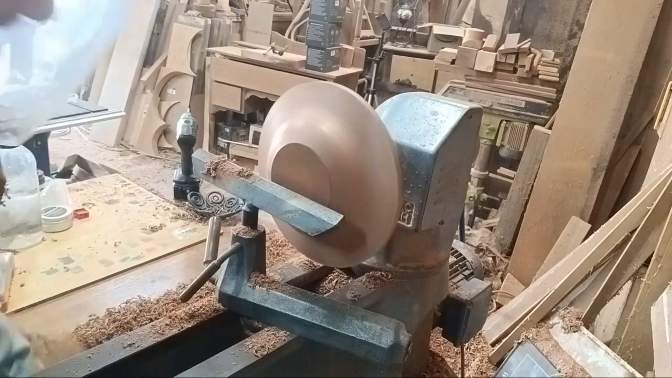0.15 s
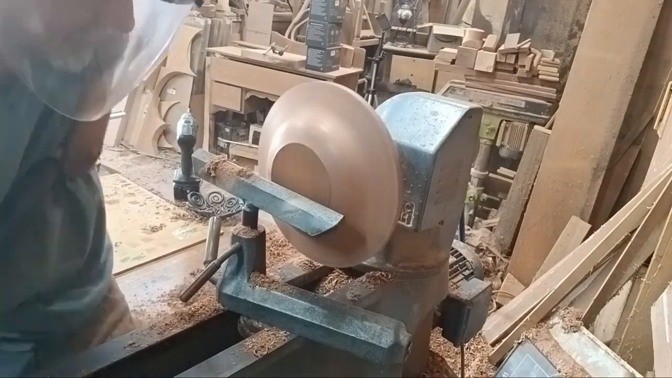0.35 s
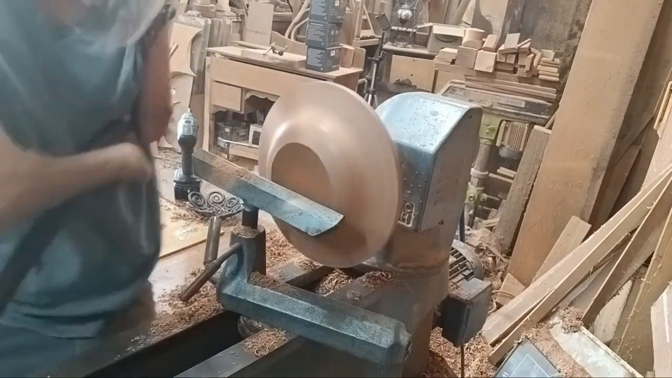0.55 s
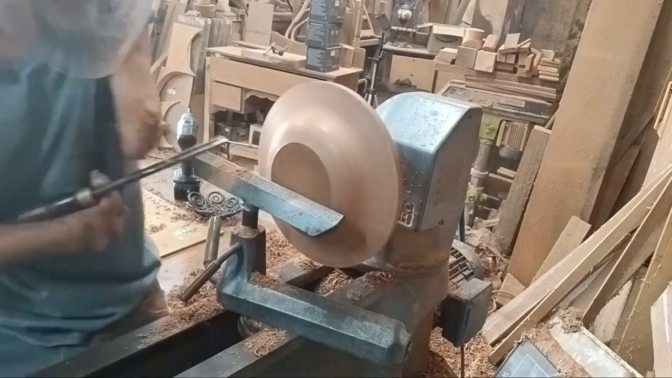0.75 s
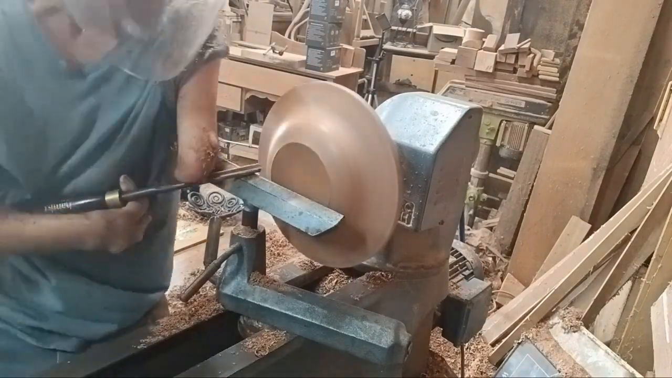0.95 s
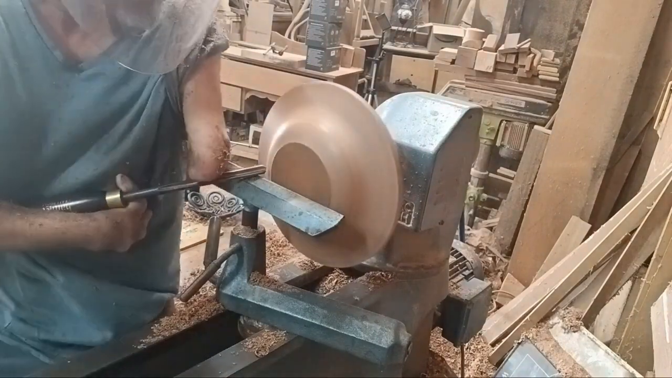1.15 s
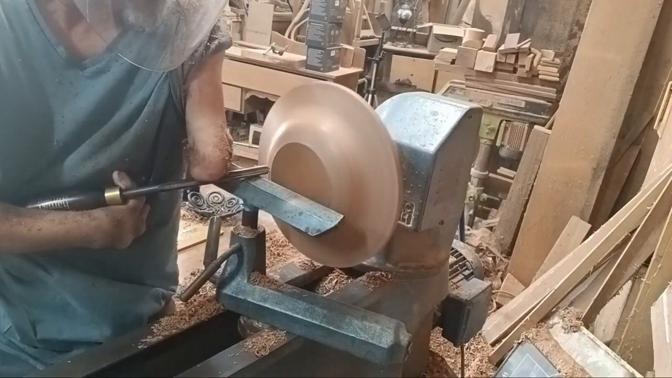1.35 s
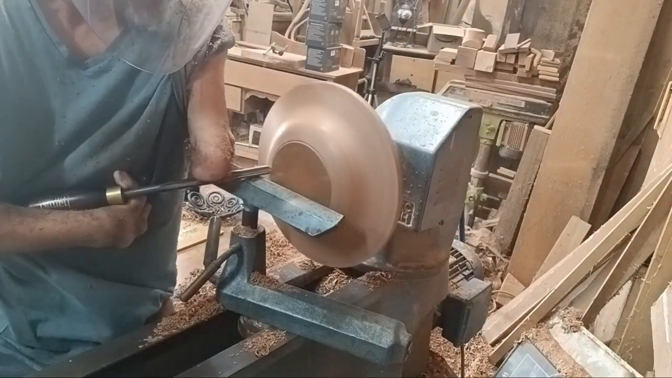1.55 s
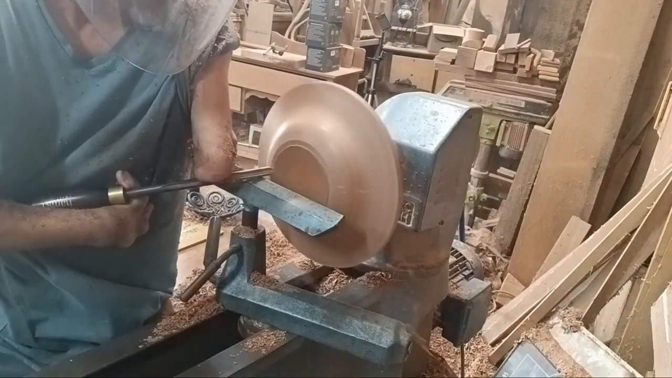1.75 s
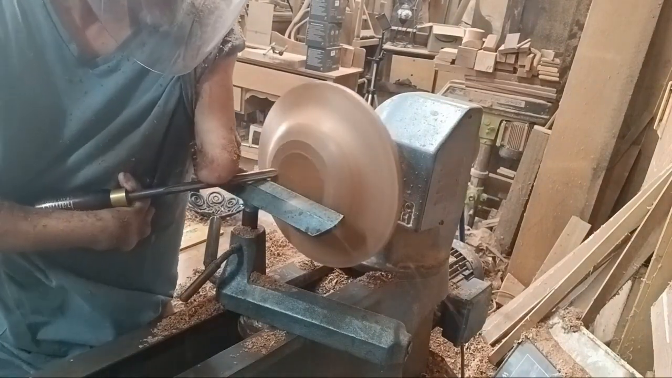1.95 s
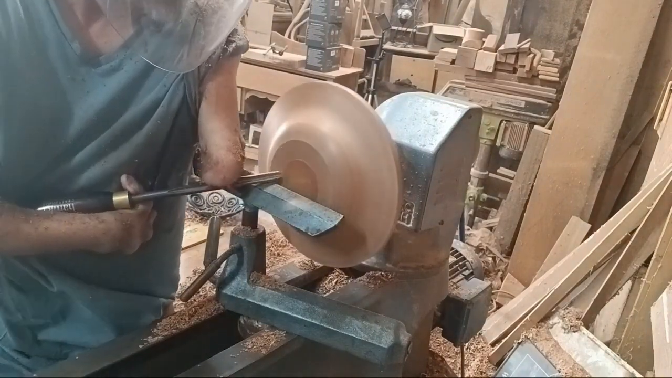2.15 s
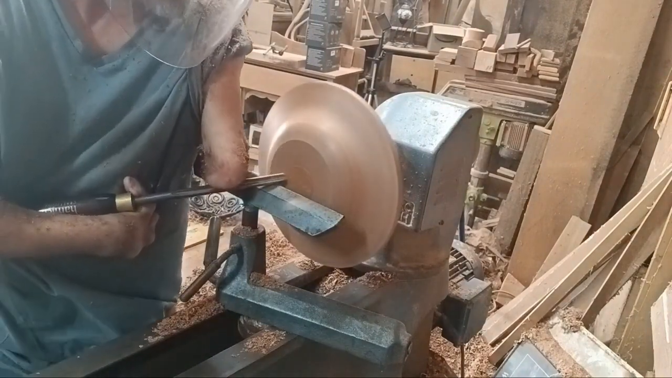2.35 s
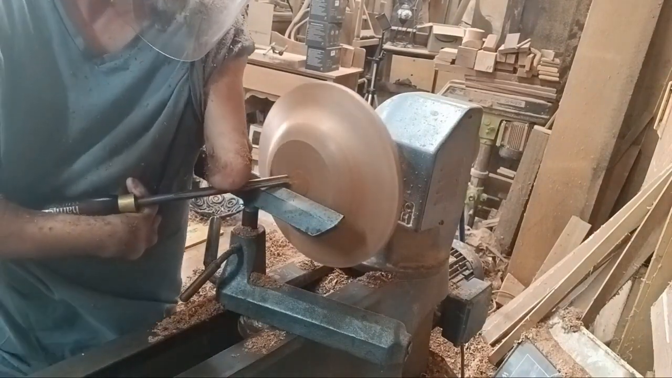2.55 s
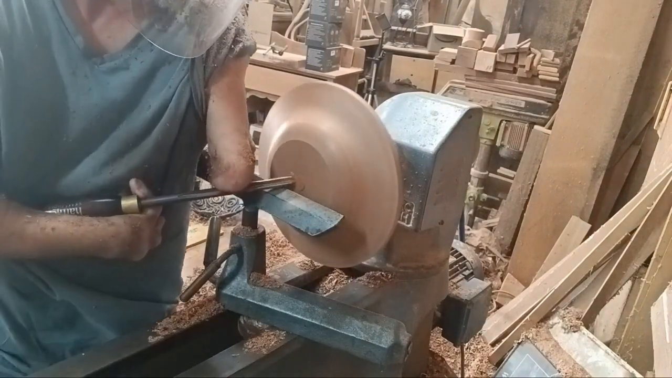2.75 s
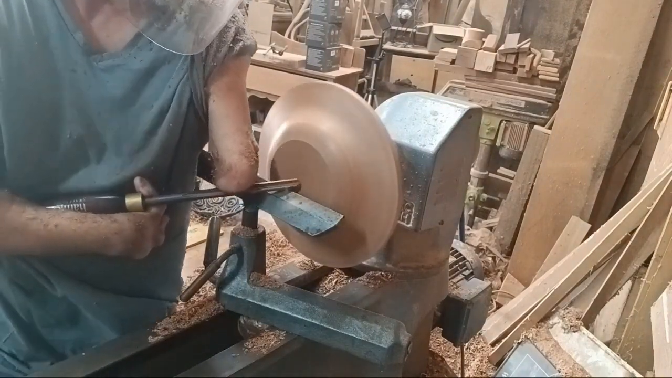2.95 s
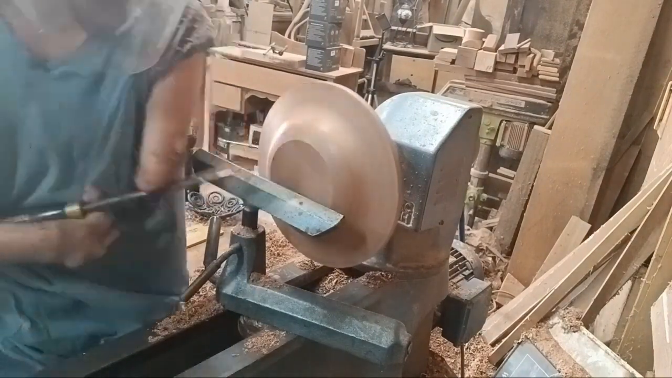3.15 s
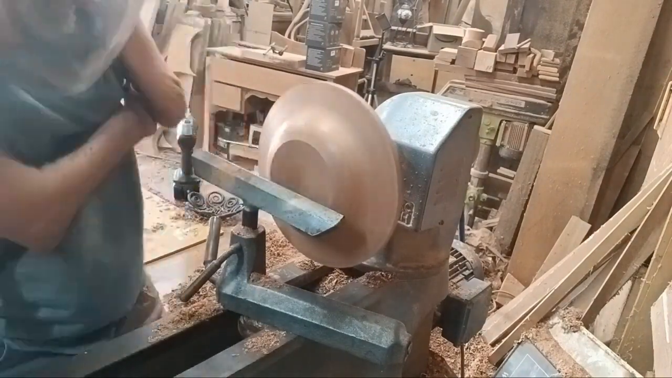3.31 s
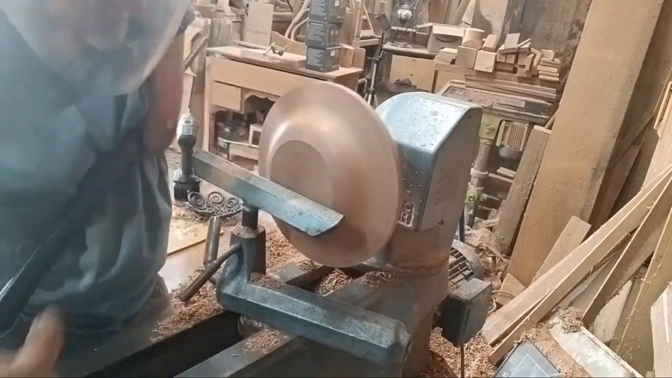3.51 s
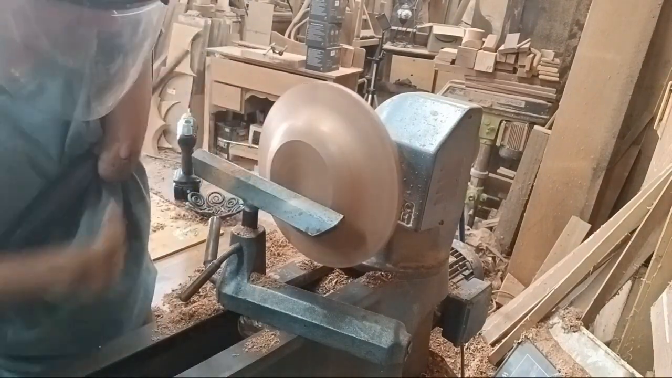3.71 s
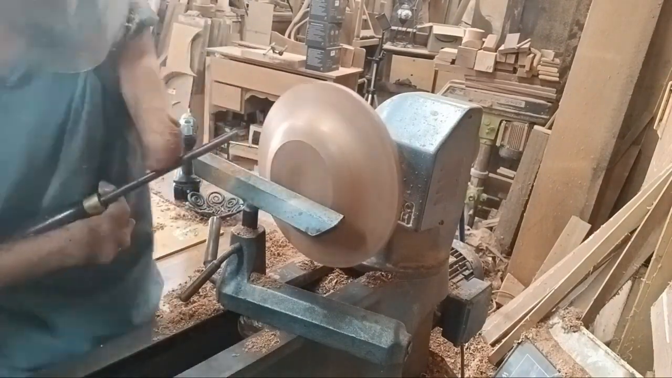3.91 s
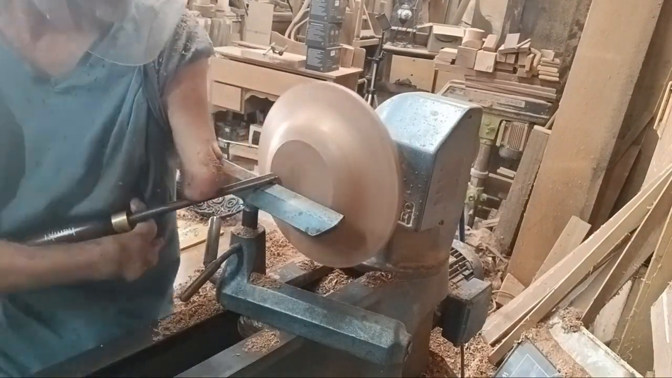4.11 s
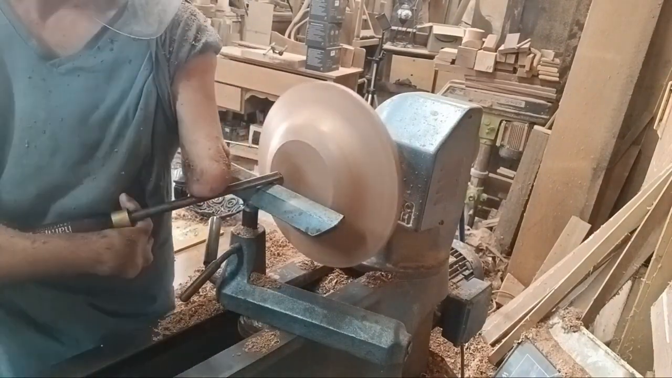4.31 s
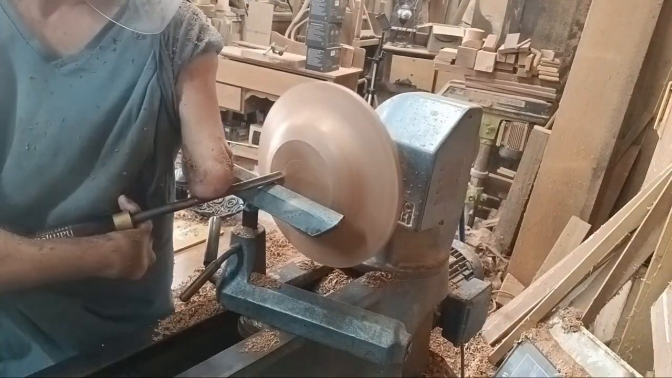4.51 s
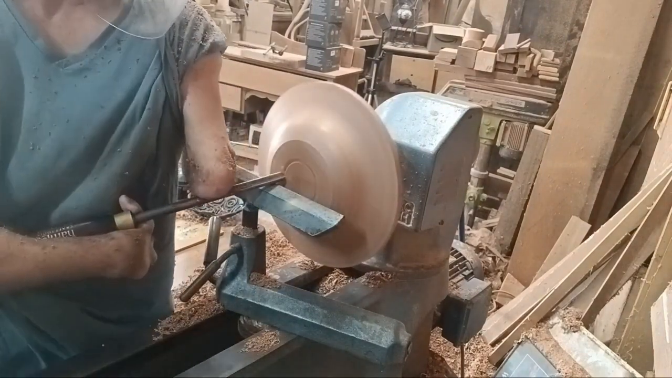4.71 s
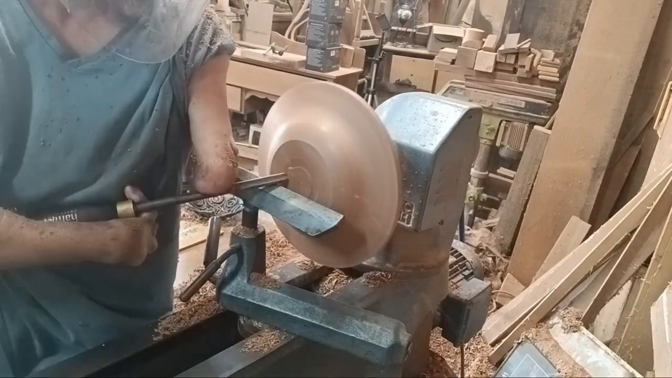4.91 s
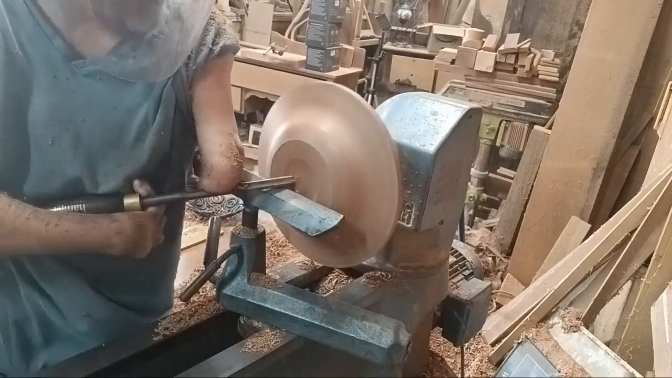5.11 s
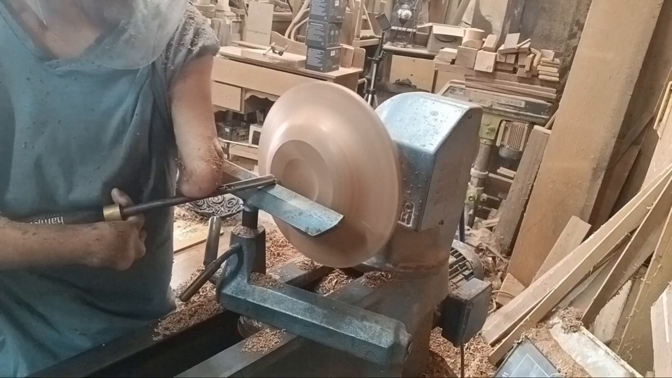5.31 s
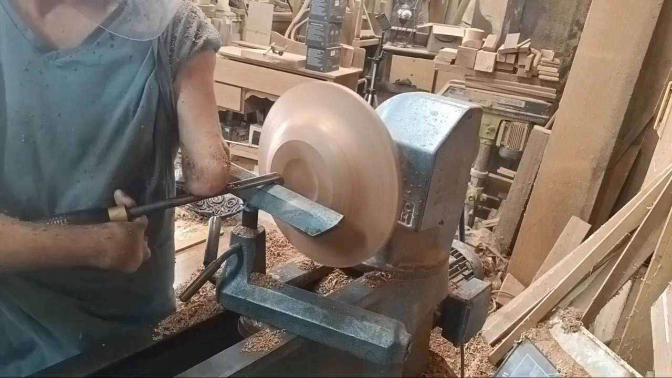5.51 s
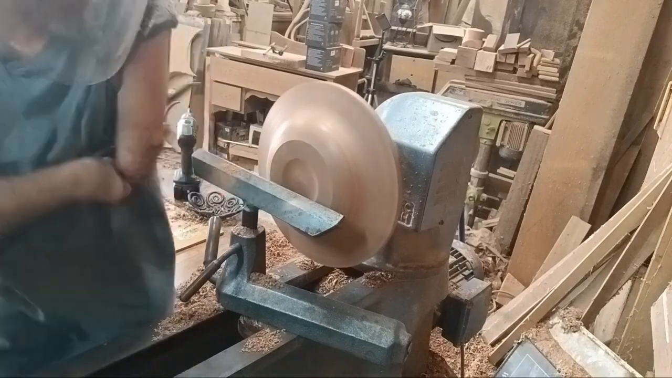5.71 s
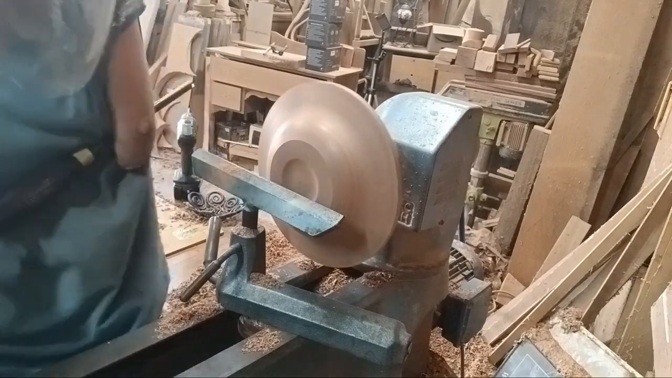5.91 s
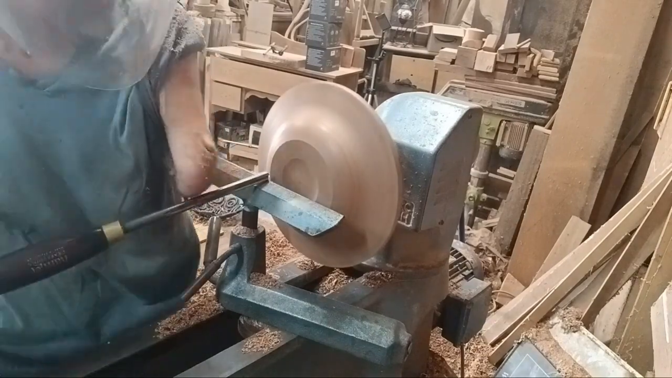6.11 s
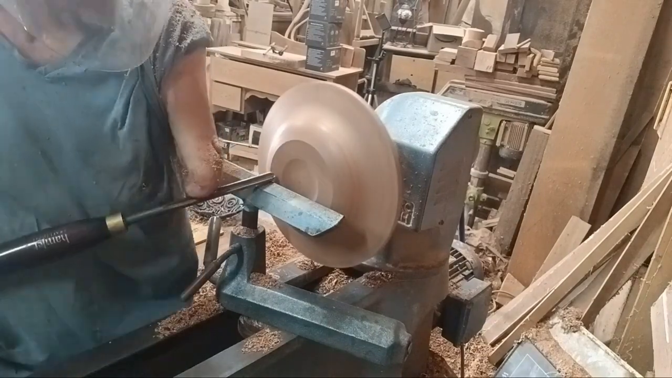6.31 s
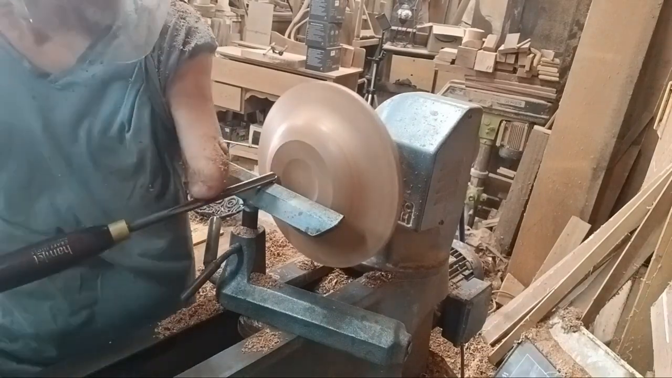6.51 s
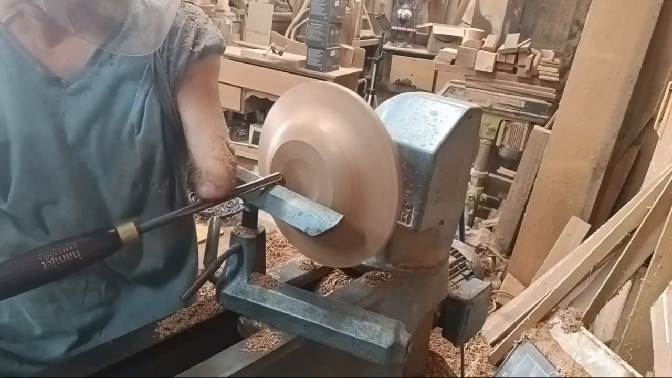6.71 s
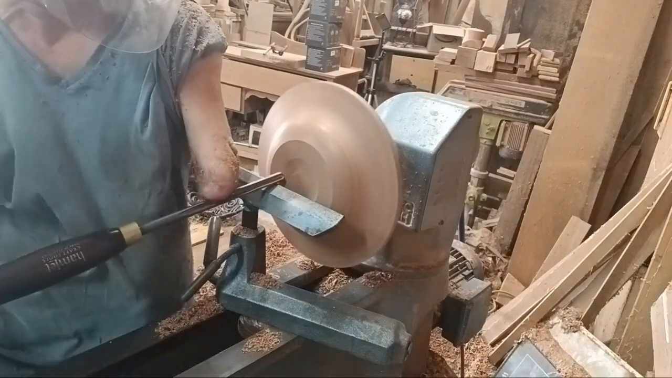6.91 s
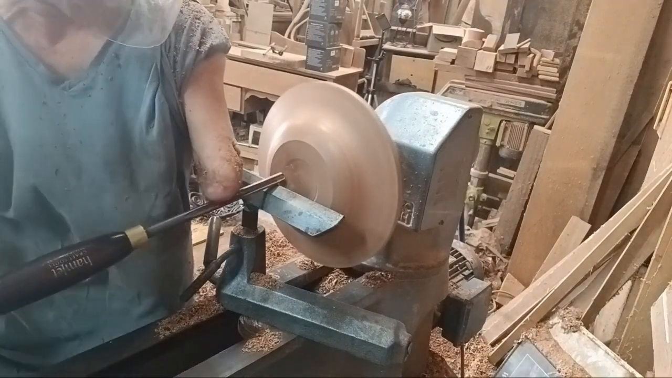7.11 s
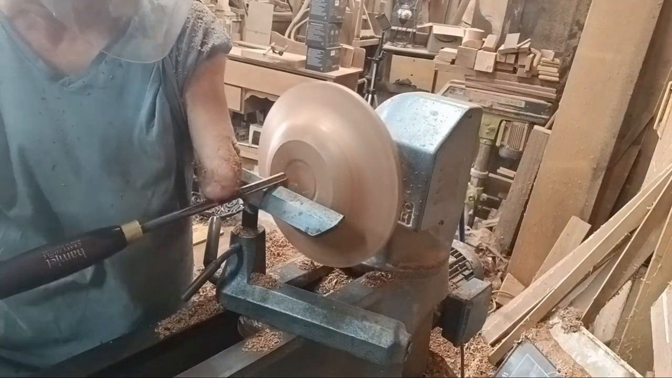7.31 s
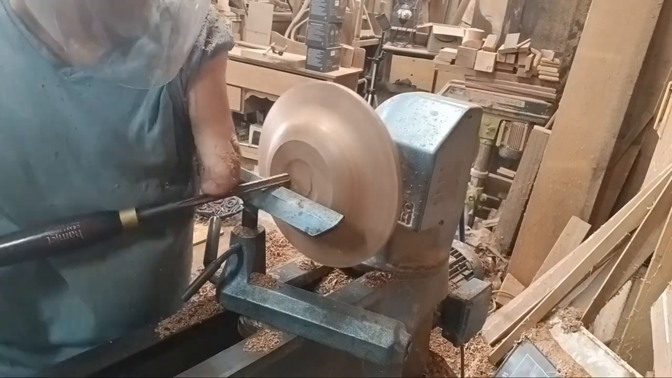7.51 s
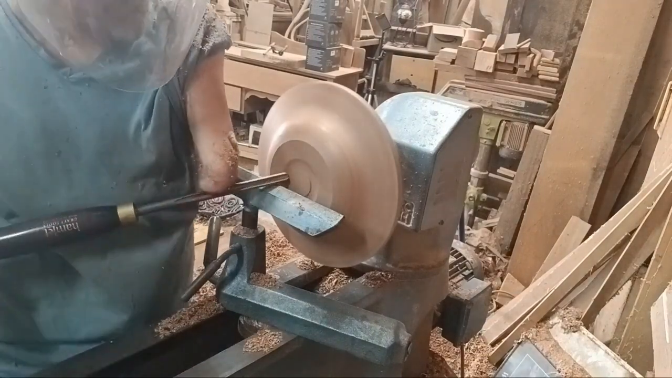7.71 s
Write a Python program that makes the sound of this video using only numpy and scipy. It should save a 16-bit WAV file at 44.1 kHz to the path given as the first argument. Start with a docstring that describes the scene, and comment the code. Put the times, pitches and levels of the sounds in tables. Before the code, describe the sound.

Close to a wood lathe in stereo: constant rushing belt and bearing noise, wavering motor hum, thin electronic whine. Dull rubbing scuffs and sharp metal knocks with short dry room scatter occur between cuts. The gouge then tears at the spinning bowl in three fierce, bright, rapidly fluttering hisses, with wood ringing and low chattering towards the centre, then starts a fourth. The motor is pushed down during each cut and swells back afterwards.

```python
"""In a small workshop a wooden bowl spins on a lathe; a gouge takes three passes and starts a fourth.
Noise through drifting resonances makes the shavings hiss, the steel sing and the bowl ring;
near the centre the bowl booms and chatters. Before and between passes the gouge knocks on iron: dying sines
and a noise crack. Soft scuffs are swells of dull noise. The motor hums and its speed drive whines, as
wavering tones in broad running noise, and the recorder's gain control ducks both under each cut."""
import sys
import numpy as np
from scipy import signal
from scipy.fft import rfft, irfft
from scipy.io import wavfile
from scipy.ndimage import uniform_filter1d

SR = 44100
rng = np.random.default_rng(int(sys.argv[2]) if len(sys.argv) > 2 else 0)


def transcribe(u):
    """Save the signal u as a 16-bit wav file named by the first command-line argument.

    u: samples, shape (n,) or (channels, n), limited to [-1, 1]; the rate is SR.
    q: integer samples, one column per channel.
    """
    v = np.clip(np.atleast_2d(u).T, -1, 1)
    q = np.round(v * 32767).astype(np.int16)
    wavfile.write(sys.argv[1], SR, q)


N = 341775
TIME = np.arange(N) / SR  # s
FFT_SIZE, HOP = 2048, 512  # samples
BINS = np.fft.rfftfreq(FFT_SIZE, 1 / SR)  # Hz

# how much later the machine reaches the left channel: frequency_hz, lag_ms
MACHINE_LAG = [(60, 0.77), (150, 1), (260, 0.81), (500, 0.46), (1000, 0.4726)]


def amp(db):
    """Decibels to gain."""
    return 10 ** (np.asarray(db) / 20)


def evened(x):
    """Scales to an rms of one."""
    return x / np.sqrt(np.mean(abs(x) ** 2) + 1e-20)


def read(points, hz):
    """Reads a curve of points along a logarithmic frequency axis."""
    point_hz, value = np.transpose(points)
    return np.interp(np.log(hz + 1), np.log(point_hz + 1), value)


def sides(db):
    """Left and right gains of constant power for a left-right level difference."""
    pair = np.array([amp(db / 2), amp(-db / 2)])
    return pair / np.sqrt(np.mean(pair ** 2, axis=0))


def drift(hz):
    """Random wander of rms one: noise under a Gaussian low-pass reaching to about hz."""
    f = np.fft.rfftfreq(N, 1 / SR)
    lowpass = np.exp(-.5 * (f / hz) ** 2)
    return evened(irfft(rfft(rng.standard_normal(N)) * lowpass, N))


def peak(hz, width, db):
    """Power response of one resonance, width in Hz between its half-power points."""
    return amp(db) ** 2 / (1 + (2 * (BINS[:, None] - hz) / width) ** 2)


def colour(x, power, balance):
    """Passes a stereo sound through a power response that may change with time, then evens it."""
    z = signal.stft(x, nperseg=FFT_SIZE, noverlap=FFT_SIZE - HOP)[2]
    response = np.sqrt(power / power.sum(axis=0))
    z = z * response * sides(read(balance, BINS))[:, :, None]
    return evened(signal.istft(z, nperseg=FFT_SIZE, noverlap=FFT_SIZE - HOP)[1][:, :N])


def spread(x, diffuse_db, fade_s, lag=43):
    """Direct sound, lag samples later on the left, in a diffuse wash that follows its power."""
    r = np.exp(-1 / (fade_s * SR))
    level = np.sqrt(signal.lfilter([1 - r], [1, -r], x ** 2))
    wash = level * rng.standard_normal((2, N))
    direct = np.array([np.roll(x, round(lag)), x])
    return direct + amp(diffuse_db) * wash


def workshop(x, t60, wet_db, lag_ms):
    """Direct sound, later on the left, and the short scatter of a room full of timber."""
    t = TIME[:SR // 4]
    tail = rng.standard_normal((2, len(t))) * (t > .0012) * np.exp(-np.log(1000) * t / t60)
    tail *= amp(wet_db) / np.linalg.norm(tail, axis=1, keepdims=True)
    tail[0, round(abs(lag_ms) * SR / 1000)] += 1  # direct sound, left
    tail[1, 0] += 1  # direct sound, right
    return signal.oaconvolve(x[None], tail, axes=1)[:, :N] / np.sqrt(1 + amp(wet_db) ** 2)


def running(flutter_db=0.83):
    """Broad noise of belt, bearings and air; how alike the two channels are depends on frequency."""
    # noise round the spinning bowl, and its treble: frequency_hz, level_db per Hz
    lower_spectrum = [(15, -80), (55, -63.5), (100, -75), (140, -60), (180, -64.5), (215, -65.5),
                      (300, -64), (350, -75.5), (450, -73), (1150, -72), (1750, -69.5), (2900, -67.5),
                      (5000, -74.5), (9700, -77)]
    top_spectrum = [(10500, -79), (12000, -88.5), (16000, -99)]
    # balance at the microphones: frequency_hz, left_right_db
    balance = [(50, 1), (200, 0), (500, 1), (1100, 0.5), (5000, 1.5), (7500, 5), (8500, 2), (9900, -10.5),
               (15000, -17)]
    # likeness of the two channels: frequency_hz, coherence (0-1)
    likeness = [(40, 0.94), (200, 0.79), (400, 1), (800, 0.26), (2000, 0.29), (5000, 0.054)]
    hz = np.fft.rfftfreq(N, 1 / SR)
    right, other = rfft(rng.standard_normal((2, N)))
    same = np.clip(read(likeness, hz), 0, 1)
    later = np.exp(-2j * np.pi * hz * read(MACHINE_LAG, hz) / 1000)
    left = (same * right + np.sqrt(1 - same ** 2) * other) * later
    shape = amp(read(lower_spectrum + top_spectrum, hz)) * sides(read(balance, hz)) * np.sqrt(SR / 2)
    return irfft(np.array([left, right]) * shape, N) * amp(flutter_db * drift(45))


def motor(steady=2.03, apart=0.58, wobble=.001):
    """Tones of the motor and its speed drive: a steady part plus narrow-band random wavering."""
    # motor hum: frequency_hz, waver_width_hz, level_db, left_right_db
    hum_tones = [(212.2, 28, -41, -2), (466.7, 38, -46, 1), (586, 11, -66, -4), (926, 9, -50, 4)]
    # switching whine of the drive: frequency_hz, waver_width_hz, level_db, left_right_db
    drive_whine = [(7672, 40, -47.5, -1), (7832, 20, -42.5, 1.5), (7912, 18, -41.5, 0), (8072, 22, -46, 5),
                   (15732, 20, -54, -10)]
    # swelling and waning of the upper hum: time_s, change_db
    hum_swell = [(0, 4), (1.4, -1), (3.2, 1), (4.4, 1.5), (5.7, 1), (6.4, -2.5), (7.7, -3.5)]
    coarse = TIME[::64]  # the wavering is slow enough for a coarse clock
    rates = np.fft.fftfreq(len(coarse), coarse[1])
    out = np.zeros((2, N))
    clock = TIME + np.cumsum(wobble * drift(1.51)) / SR
    for hz, width, db, pan_db in hum_tones + drive_whine:
        noise = rng.standard_normal((3, len(coarse), 2)) @ [1, 1j]
        chance = np.fft.fft(noise) / (1 + (rates / width) ** 2 * 2)
        shared, *own = evened(np.fft.ifft(chance))
        lead_s = read(MACHINE_LAG, hz) / 1000
        swell = amp(np.interp(coarse, *np.transpose(hum_swell)) * (400 < hz < 1000))
        for channel, gain in enumerate(sides(pan_db)):
            # short waves reach each channel by different paths
            waver = evened(steady + shared + apart * np.sqrt(hz / 1500) * own[channel])
            carrier = np.exp(2j * np.pi * hz * (clock + channel * lead_s))
            tone = np.interp(TIME, coarse, swell * waver) * carrier
            out[channel] += gain * amp(db) * np.sqrt(2) * tone.real
    return out


def scuffs():
    """Short, dull swells of rubbing as the turner shifts his stance."""
    # each scuff: centre_s, half_length_s, level_db
    shifts = [(0.143, .03, -34.5), (3.907, 0.014, -31.5), (3.943, 0.019, -34.5)]
    # colour of the rubbing: frequency_hz, level_db
    rub_spectrum = [(100, -23), (280, -1.5), (550, -8.5), (1000, -16), (3000, -30), (9000, -50)]
    swell = sum(amp(db) * np.exp(-((TIME - s) / half_s) ** 2) for s, half_s, db in shifts)
    rub = spread(rng.standard_normal(N), diffuse_db=1, fade_s=0.0045)
    return swell * colour(rub, amp(read(rub_spectrum, BINS))[:, None] ** 2, [(400, 1)])


def ringing(modes):
    """Struck iron: a sum of sine modes, each dying exponentially by its own t60."""
    t = TIME[:SR // 4]
    return sum(amp(db) * np.exp(-np.log(1000) * t / t60) * np.sin(2 * np.pi * hz * t)
               for hz, db, t60 in modes)


def knocks(crack_db=-0.5, crack_s=0.0046, low_hz=560):
    """Gouge on iron: each knock cracks, rings the bed or the rest, and rebounds once."""
    # each knock: start_s, level_db, share of the tool rest against the lathe bed (0-1),
    # brightness_hz, rebound_after_s, rebound_db against the knock
    blows = [(0.2609, -8.5, 0, 7500, 0.0031, -22), (0.336, -32, 0, 1500, .004, -4),
             (3.099, -17, 0.67, 2600, 0.00293, -8), (4.0696, -14.5, 0.87, 9500, .007, -8.5),
             (6.122, -27, 0.1, 1600, .005, -6)]
    # modes of the lathe bed, and of the tool rest: frequency_hz, level_db, t60_s
    bed_modes = [(415, -3, .06), (822, -19, 0.17), (871, 2, 0.053), (1383, 0.5, 0.055), (1847, -6.5, 0.049),
                 (2468, -3, 0.048), (2850, -20, 0.061), (3200, -2, 0.037), (4560, -14, 0.05),
                 (5960, -25, 0.026), (7100, -30, .03), (8350, -8, .03)]
    rest_modes = [(650.3, -9.5, 0.12), (1250, -2.5, 0.039), (2200, -3, 0.039), (2450, -8.5, 0.051),
                  (2970, 8.5, 0.017), (4115, -2, 0.037), (4990, 0, 0.035), (6070, -2, 0.026),
                  (6440, -1, 0.035), (8200, 6, 0.013), (9184, -9, .03), (11700, -17, .02)]
    out = np.zeros(N + SR)
    bed, rest = ringing(bed_modes), ringing(rest_modes)
    for s, db, share, bright_hz, rebound_s, rebound_db in blows:
        for at, gain in ((s, amp(db)), (s + rebound_s, amp(db + rebound_db))):
            crack = amp(crack_db) * rng.standard_normal(len(bed)) * np.exp(-TIME[:len(bed)] / crack_s)
            blow = (1 - share) * bed + share * rest + uniform_filter1d(crack, size=4)
            # the knocks carry little bass, and soft knocks are dull
            blow = signal.lfilter(*signal.butter(3, low_hz, "high", fs=SR), blow)
            blow = signal.lfilter(*signal.butter(2, min(bright_hz, SR / 3), fs=SR), blow)
            out[round(at * SR):][:len(blow)] += gain * blow
    return workshop(out[:N], t60=0.034, wet_db=2.0, lag_ms=0.866)


def strokes(wander_db=0.54, wander_hz=6.5):
    """Depth (dB), place from outside (0) to centre (1), time since touch and since lift (s)."""
    # passes from the outside in: start_s, length_s, reach towards the centre (0-1), full_depth_db,
    # first_touch_db below full, sink_in_s, easing_off_db, ease_off_s
    passes = [(1.438, 1.493, 1, -0.9, 21, 0.099, 13.5, 0.14), (4.388, 0.79, 0.9, 0.5, 29, 0.28, 21.5, 0.16),
              (6.896, 0.673, 0.71, -0.8, 22, .36, 9.5, 0.12), (7.725, 0.57, .68, -3.5, 19.5, .06, 10, .2)]
    # the edge catches and digs in for a moment: centre_s, half_length_s, deeper_db
    catches = [(1.48, .009, 9.5), (1.572, 0.023, 5.5), (5, 0.015, 2), (6.911, .008, 2.5), (6.97, 0.043, 8),
               (7.325, 0.045, 6.5)]
    depth_db, inward, since_touch, since_lift = np.zeros((4, N))
    for start, length, reach, full_db, touch_db, sink_s, ease_db, ease_s in passes:
        on = TIME >= start
        t = TIME[on] - start
        sinking_db = touch_db * np.clip(1 - t / sink_s, 0, 1)
        easing_db = ease_db * np.clip(1 - (length - t) / ease_s, 0, 1)
        depth_db[on] = full_db - sinking_db - easing_db
        inward[on] = reach * np.minimum(t / length, 1)
        since_touch[on] = t
        since_lift[on] = np.maximum(t - length, 0)
    catch_db = sum(db * np.exp(-((TIME - s) / half_s) ** 2) for s, half_s, db in catches)
    hand_db = wander_db * drift(wander_hz)  # the hand never feeds quite evenly
    return depth_db + catch_db + hand_db, inward, since_touch, since_lift


def voices():
    """Gains of hiss, ring, boom and chatter from the depth of cut, and the place of the edge (0-1)."""
    # each voice of the cut: outside_db, centre_db, gain in dB per dB of depth
    # the wood runs slower near the centre, so the shaving hisses less
    hiss_law = (-6, -9, 0.82)
    ring_law = (-18.5, -11, 0.62)
    boom_law = (-37.5, -24.5, 0.3)
    meet_s = .008  # the edge meets the wood in this time
    release_s, boom_release_s = 0.021, 0.023  # time constants after the lift; the spindle rings on longer
    boom_db_per_s = 7  # the longer the edge stays in the wood, the more the bowl shakes
    chatter_outside_db, chatter_centre_db = -34, 0.5  # against the boom
    depth_db, inward, since_touch, since_lift = strokes()
    meeting = np.minimum(since_touch / meet_s, 1)
    hiss, ring, boom = (
        amp(outside_db + (centre_db - outside_db) * inward + follow * depth_db) * meeting
        for outside_db, centre_db, follow in (hiss_law, ring_law, boom_law))
    lift = np.exp(-since_lift / release_s)
    in_wood_s = since_touch - since_lift
    boom = boom * amp(boom_db_per_s * in_wood_s) * np.exp(-since_lift / boom_release_s)
    judder = boom * amp(chatter_outside_db + (chatter_centre_db - chatter_outside_db) * inward)
    return hiss * lift, ring * lift, boom, judder, inward


def fibres(per_s, spread_db, smooth):
    """Wood fibres snap at the edge, a few of them hard, over smooth rubbing."""
    strength = amp(spread_db * np.minimum(rng.exponential(1, N), 4))
    snaps = (rng.random(N) < per_s / SR) * rng.choice([-1, 1], N) * strength
    return evened(evened(snaps) + smooth * rng.standard_normal(N))


def patches(frames, count, size):
    """Random field of rms one, smoothed over count bins and size frames."""
    field = rng.standard_normal((len(BINS), len(frames)))
    across_bins = uniform_filter1d(field, count, axis=0)
    return evened(uniform_filter1d(across_bins, size, axis=1))


def chatter(pitch_hz=234, waver=0.0116, uneven_db=-1.5, lag=36):
    """The edge locks onto the flexing of bowl and spindle: a wavering tone, lag samples later on the left."""
    phase = 2 * np.pi * np.cumsum(pitch_hz * (1 + waver * drift(7.86))) / SR
    tone = np.sin(phase) * amp(uneven_db * drift(23))
    return evened(np.array([np.roll(tone, round(lag)), tone]))


def cutting(throb_db=2.0, uneven_db=0.84, tear_db=0.9, streak_db=2.5, flicker_db=1.68):
    """The shaving throbs with the grain and drives the steel, the bowl and the spindle."""
    # four sets of ringing of gouge and hold, which change within the first pass and between passes:
    # time_s; set that rings at each of those times (0-3)
    set_times = [1.8, 2.2, 2.95, 4.4, 5.2, 6.9]
    set_numbers = [0, 1, 1, 2, 2, 3]
    # gouge on its rest: frequency_hz, width_hz, level_db over the hiss in set 0, 1, 2, 3
    steel_modes = [(4750, 370, 1, -20, -2, -3), (5260, 200, 1, 7, 6.5, -2.5), (5846, 124, -0.5, 4, 6, 5.5),
                   (6580, 150, 11.5, 1, 8.5, 2), (6430, 70, -20, -7, 4, -7), (7450, 390, -1, 8, 7.5, 0),
                   (8260, 102, 14, 4.5, 11.5, 9), (8800, 220, 0, -2, 2, -8),
                   (9920, 145, 5.5, 10.5, 11.5, 6.5), (11050, 1400, -5, 0.5, 1.5, 0.5),
                   (12000, 890, -7, -10, -2, -6), (14450, 1500, -0.5, -2.5, 1.5, -2)]
    # bowl: frequency_hz, width_hz, outside_db and centre_db over the scraping
    bowl_modes = [(740, 72, -6, 0.5), (863, 130, 7, 5), (905, 75, 0, 0), (1316, 48, 4.5, 5),
                  (1730, 91, -3, -8), (1780, 58, 2, -5), (2170, 89, 1.5, 4), (2463, 26, 6, 15),
                  (3243, 41, 8, 7.5)]
    # bowl and spindle flexing as a whole: frequency_hz, width_hz, level_db
    flex_modes = [(225.7, 10.6, 17), (302, 53, 7)]
    # smooth spectra of the hiss, the scraping and the push on the wood: frequency_hz, level_db
    hiss_spectrum = [(1500, -66), (2800, -2.5), (4100, -8.5), (4800, -5.5), (6800, -2), (7900, -3.5),
                     (9200, -3.5), (10300, -10), (11800, -16.5), (13100, -13.5), (16000, -29.5)]
    scrape_spectrum = [(150, -65), (400, -11.5), (600, -15), (740, 0.5), (1100, -2.5), (1600, 0.5),
                       (2200, -2), (3300, -2.5), (4000, -4.5), (5500, -12), (9000, -44)]
    push_spectrum = [(30, -24), (110, -20.5), (160, -8), (200, -4), (290, 0), (360, -20.5), (600, -12),
                     (1500, -60)]
    # balance of the hiss and of the bowl at the microphones: frequency_hz, left_right_db
    hiss_balance = [(3000, 14), (5500, 2.5), (7400, 7.5), (8500, 3), (9200, 25), (9900, -35), (10800, -6.5),
                    (14000, -2)]
    bowl_balance = [(650, 3.5), (950, -2), (1300, -4), (1650, 3.5), (2400, -1), (3500, -2)]
    end_grain_hz = 43  # mean rate: the edge meets end grain twice a turn
    slope_outside_db, slope_centre_db = 4.5, -2.5  # per octave
    hiss, ring, boom, judder, inward = voices()

    phase = 2 * np.pi * np.cumsum(end_grain_hz * (1 + .012 * drift(7.4))) / SR
    throb = np.cos(phase) + 0.089 * np.cos(phase / 2)  # twice and once a turn
    bite = evened(amp(throb_db * throb + uneven_db * drift(27) + tear_db * drift(170)))

    # the levels of the steel's modes glide from set to set, and their pitches wander as it slides on the rest
    frames = np.arange(-(-N // HOP) + 1) * HOP / SR
    ringing_set = np.interp(frames, set_times, set_numbers)
    slide = 1 + .005 * np.interp(frames, TIME, drift(2))
    steel = sum(peak(hz * slide, width, np.interp(ringing_set, np.arange(len(db)), db))
                for hz, width, *db in steel_modes)

    # the place of the edge decides which modes of the bowl it drives, and how dark it scrapes
    place = np.interp(frames, TIME, inward)
    octaves = np.log2(BINS[:, None] / 1500 + .01)
    slope_db = octaves * (slope_outside_db + (slope_centre_db - slope_outside_db) * place)
    bowl = sum(peak(hz, width, np.interp(place, [0, 1], db)) for hz, width, *db in bowl_modes)
    wood = (1 + bowl) * amp(slope_db) ** 2
    flex = 1 + sum(peak(*mode) for mode in flex_modes)

    # the colour of hiss and ring flickers at random in streaks
    streaks_db = streak_db * patches(frames, count=7, size=24)
    streaks_db = streaks_db + flicker_db * patches(frames, count=18, size=3)
    hiss_power = steel * amp(read(hiss_spectrum, BINS)[:, None] + streaks_db) ** 2
    ring_power = wood * amp(read(scrape_spectrum, BINS)[:, None] + streaks_db) ** 2
    boom_power = flex * amp(read(push_spectrum, BINS))[:, None] ** 2

    edge = spread(bite * fibres(per_s=7000, spread_db=3.5, smooth=0.54), diffuse_db=6.0, fade_s=0.0039)
    push = spread(bite * rng.standard_normal(N), diffuse_db=-17, fade_s=.005, lag=33.3)
    return (hiss * colour(edge, hiss_power, hiss_balance)
            + ring * colour(edge, ring_power, bowl_balance)
            + boom * colour(push, boom_power, [(234, 0)])
            + judder * chatter())


def scene():
    """The running lathe, the scuffs, the knocks and the cuts."""
    return running() + motor() + scuffs() + knocks() + cutting()


def record(dry, threshold_db=-19, squeeze=0.65, recovery_db=60, ceiling=.92, edge_hz=15950):
    """Gain control restrains the cuts and ducks the machine; then a soft ceiling and the band limit."""
    power_db = 10 * np.log10(abs(uniform_filter1d((dry ** 2).mean(0), size=3000)) + 1e-12)
    # the held level falls by recovery_db each second until a louder sound lifts it
    fall = TIME * recovery_db
    held_db = np.maximum.accumulate(power_db + fall) - fall
    over_db = np.maximum(held_db - threshold_db, 0)
    ducked = dry / amp(min(squeeze, 1) * uniform_filter1d(over_db, size=1500))
    limited = ducked / (1 + (ducked / ceiling) ** 8) ** (1 / 8)
    lowpass = signal.firwin(511, edge_hz, window=("kaiser", 9), fs=SR)
    return signal.oaconvolve(limited, lowpass[None], "same")


dry = scene()
out = record(dry)
transcribe(out)
```